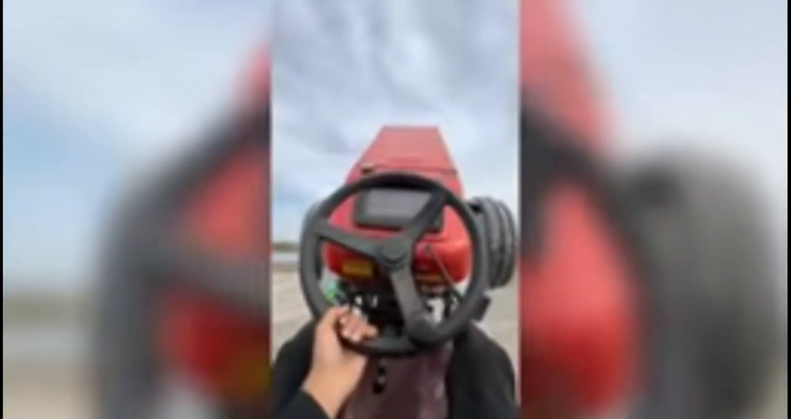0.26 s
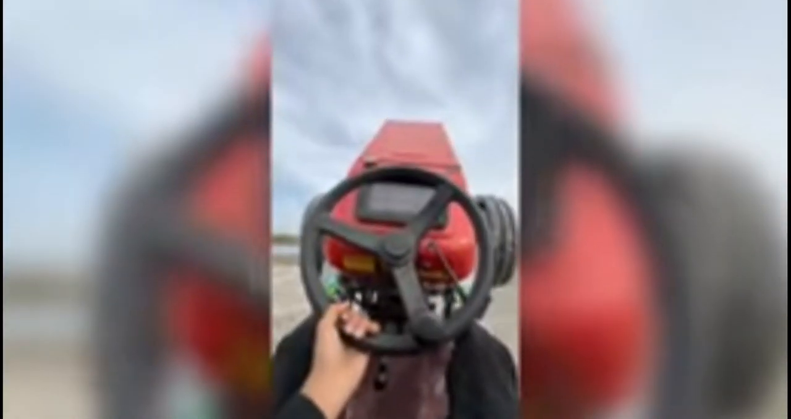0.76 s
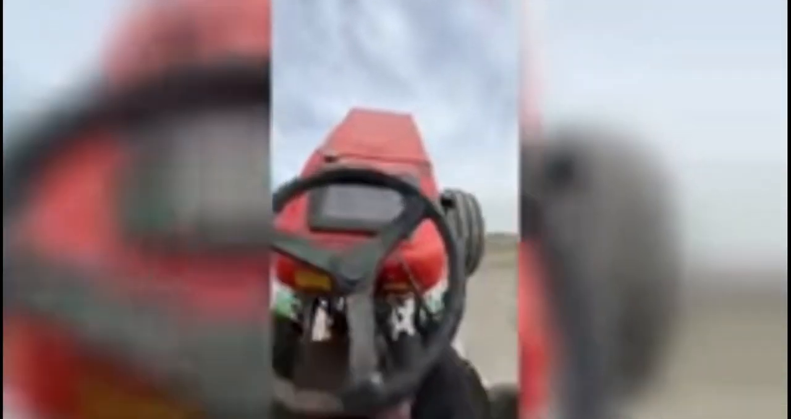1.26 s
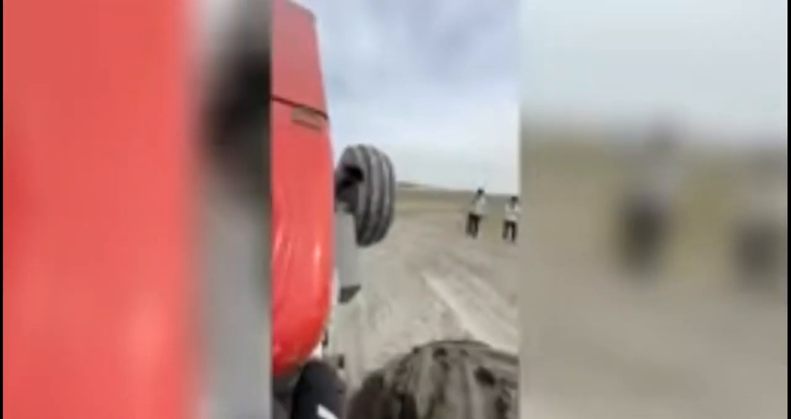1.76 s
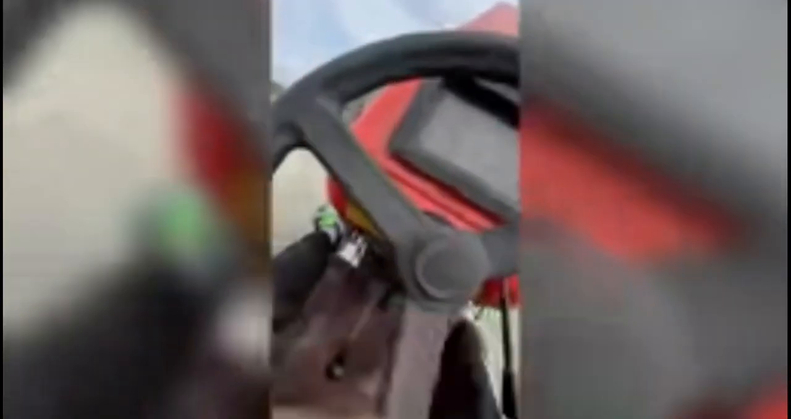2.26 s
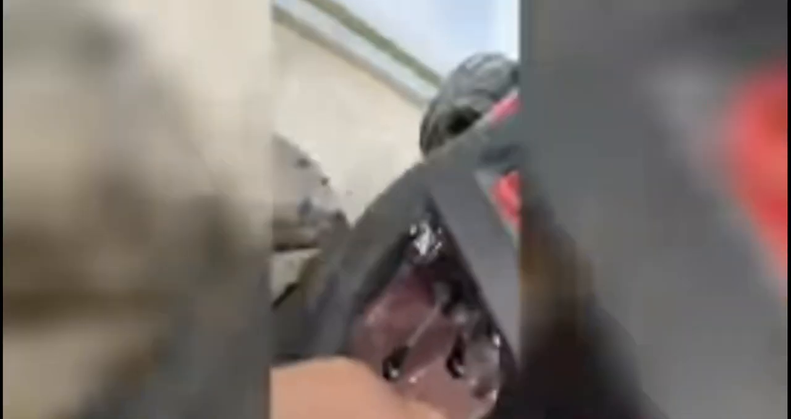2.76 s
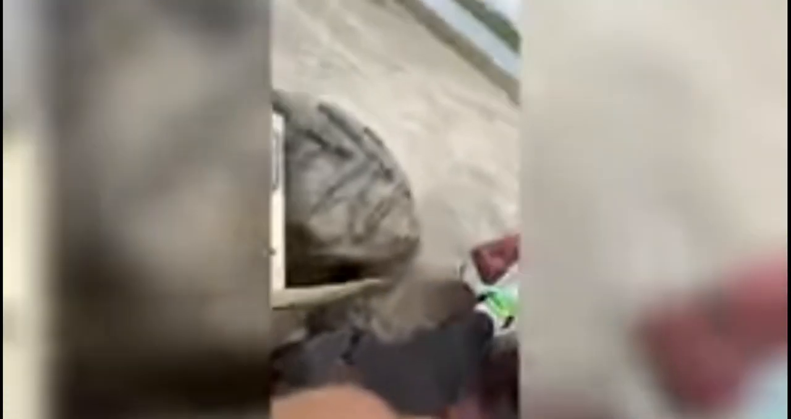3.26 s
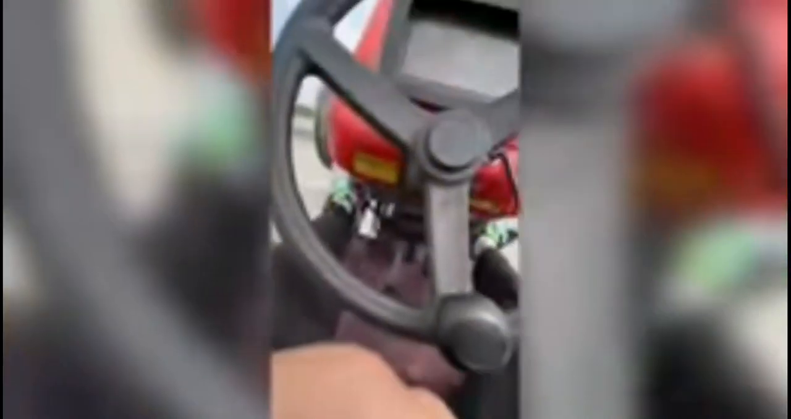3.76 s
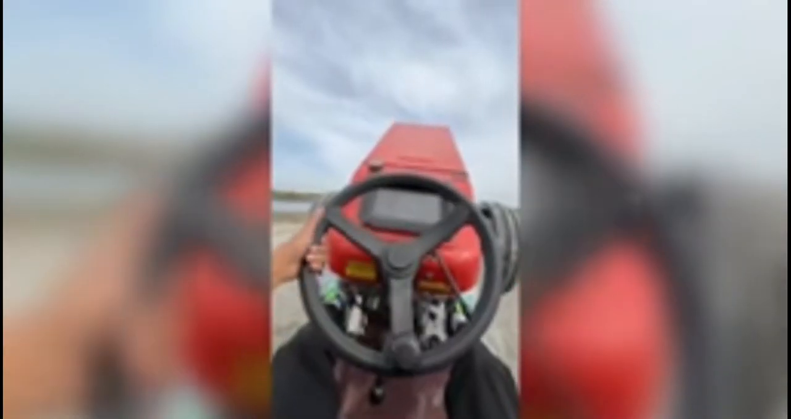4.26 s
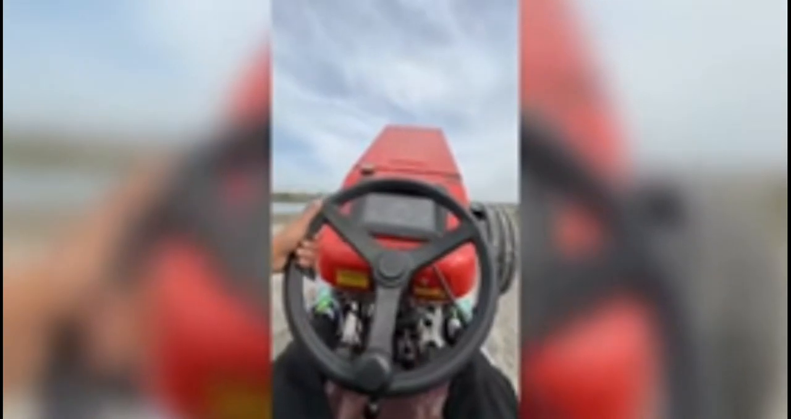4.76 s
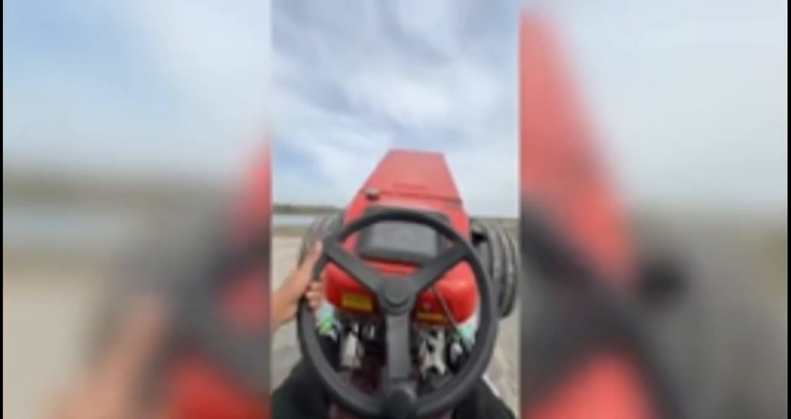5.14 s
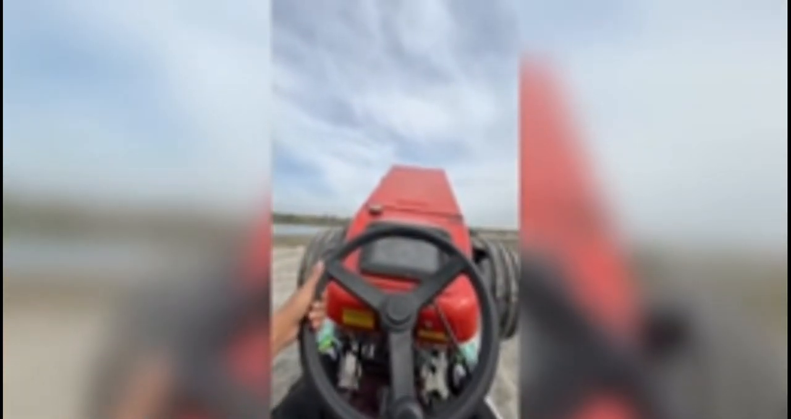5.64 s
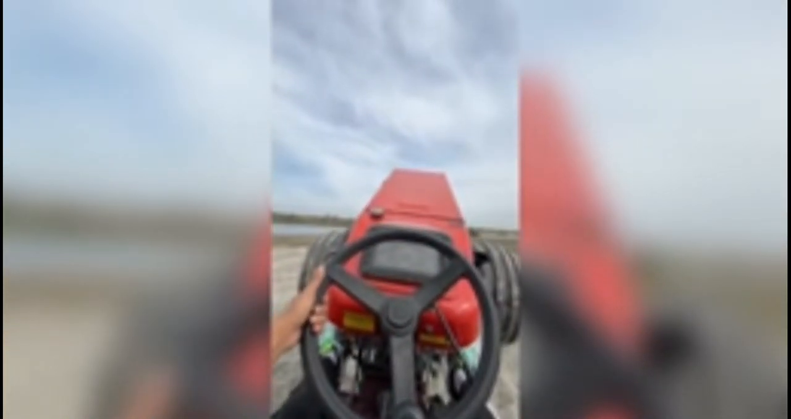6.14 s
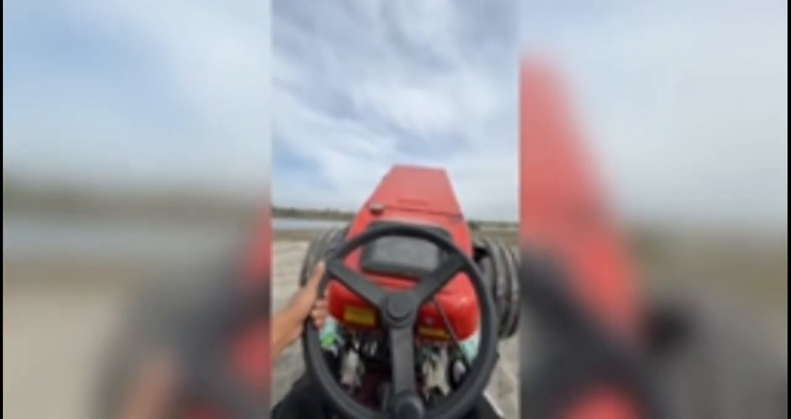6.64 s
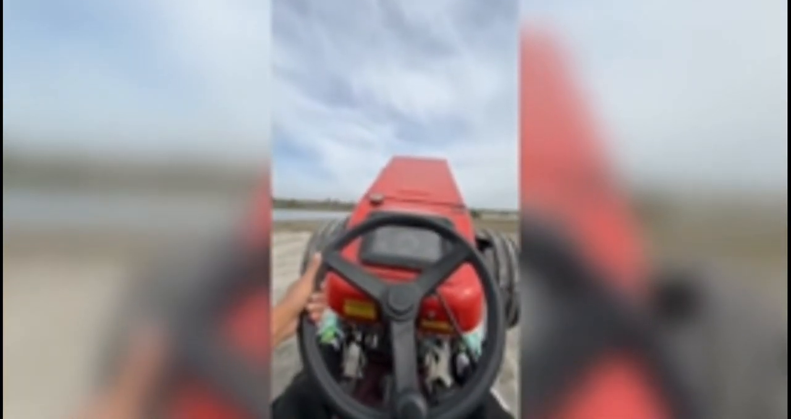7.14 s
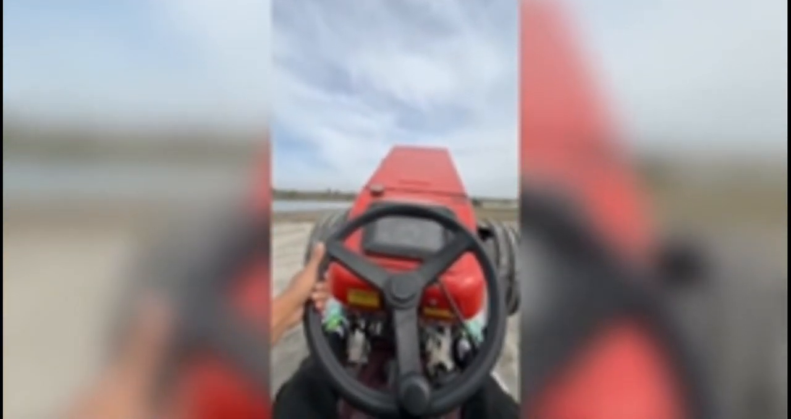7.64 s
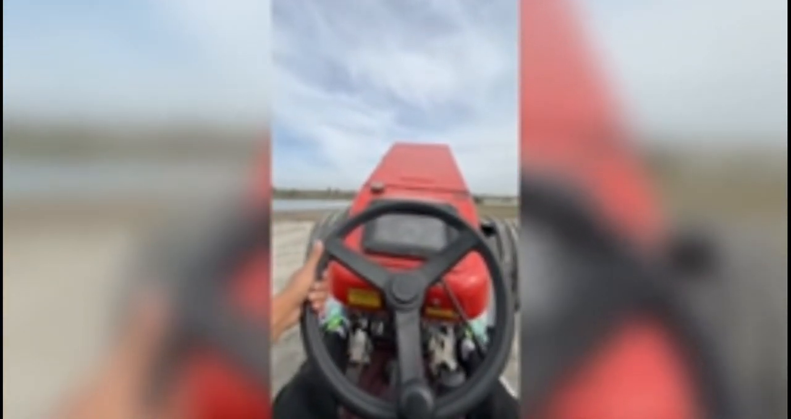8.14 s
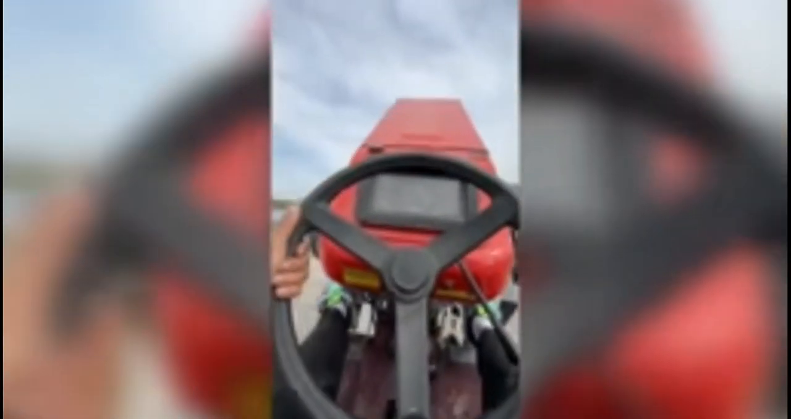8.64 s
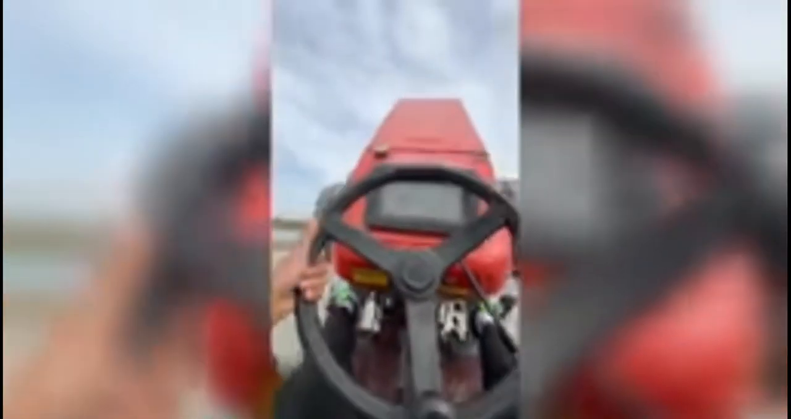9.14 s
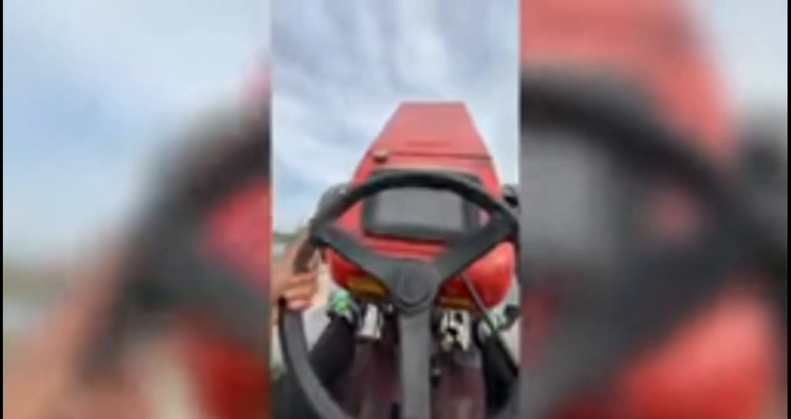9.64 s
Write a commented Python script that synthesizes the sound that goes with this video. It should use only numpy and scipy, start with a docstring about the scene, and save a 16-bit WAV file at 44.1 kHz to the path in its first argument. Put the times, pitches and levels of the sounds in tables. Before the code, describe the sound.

A three-cylinder tractor diesel runs outdoors, close to a small, thin-bassed microphone. From 0 s it clatters at about 36 firings a second, each a hard metallic knock with a short ring, a pulsing whistle near 7 kHz and a weak exhaust puff. Knocks are strongest around 1.1 s. A short rustle comes at 1.5-1.6 s as the microphone turns aside; until about 3 s the engine is quieter, duller and more of a rough roar, with a wavering gear tone near 530 Hz. At 3.34 s everything snaps off for a tenth of a second, then returns crisp and strongly knocking, steady to 8 s, the whistle higher and fainter. Around 8.4-8.9 s and again 9.4-9.7 s the knock dies to a softer mechanical rush, the firing rate wobbling slightly, knock returning after each. From 9.7 s a faint low hum winds up, with thin hiss swelling.

```python
"""Three-cylinder diesel tractor

A three-cylinder diesel tractor runs outdoors, heard by a small microphone that turns about.
Each firing excites the modes of the block, puffs down the exhaust and blows a high whistle; noise from
gears and fan roars in the same block, a gear sings for a while and a thin hiss lies on top.
The sound drops out once; twice the governor cuts the fuel and the knock dies; a hum winds up at the end."""
import sys
import numpy as np
from scipy import signal
from scipy.fft import rfft, irfft
from scipy.io import wavfile
from scipy.ndimage import uniform_filter1d, minimum_filter1d

SR = 44100
rng = np.random.default_rng(int(sys.argv[2]) if len(sys.argv) > 2 else 0)


def output_pcm(signal):
    """Save a mono or channel-first signal as 16-bit PCM at the path in sys.argv[1].

    Samples are clipped to [-1, 1] before scaling.
    """
    pcm = np.clip(np.atleast_2d(signal).T, -1, 1) * 32767
    wavfile.write(sys.argv[1], SR, np.round(pcm).astype(np.int16))


N = 436590
T = np.arange(N) / SR  # time in s

# Firing rate, one list before and one after the drop-out. Each row: time in seconds, firings per second.
FIRING_RATE = ([(0.0, 36.054), (0.8, 36.298), (1.62, 36.178), (3.34, 36.171)], [(3.43, 36.234),
                (4.93, 36.099), (5.73, 36.212), (7.77, 36.06), (8.08, 34.874), (8.23, 35.16),
                (8.54, 37.701), (8.71, 37.318), (9.09, 34.062), (9.26, 34.652), (9.46, 37.435),
                (9.59, 37.788), (9.9, 34.322)])
# Firings already done in the engine cycle when each of the two stretches starts.
FIRINGS_DONE = (2.6, 2.1)
# Relative strength of each cylinder in dB.
CYLINDER_DB = [-3, -5, -3.5]
# The clearest firings. Each row: time in seconds, nominal peak in dB, strongest ring in Hz.
HARD_KNOCKS = [(0.0682, -6.5, 2340), (0.095, -7, 2385), (0.1226, -12, 2480), (0.2334, -9, 2680),
               (0.3436, -6.5, 2390), (0.3985, -9.5, 2135), (0.4259, -4, 2690), (0.509, -5, 2340),
               (0.6748, -9.5, 2400), (0.869, -9, 2300), (0.8953, -8, 2380), (0.9778, -5.5, 2290),
               (1.0061, -6.5, 2300), (1.0337, -5, 2170), (1.0879, -1, 1550), (1.143, -2, 1490),
               (1.1717, -2, 2310), (1.3359, -2.5, 2020), (1.3643, -4.5, 3750), (1.4187, -6, 3600),
               (1.4745, -8, 3700), (1.503, -5.5, 2280), (1.6681, -8, 2680), (1.391, -9, 1980),
               (1.447, -9, 3870), (1.779, -10, 3620), (2.083, -12.5, 1480), (2.255, -11.5, 3300),
               (2.331, -12.5, 1530), (2.414, -11, 1450), (2.9982, -3, 2375), (3.0785, -7.5, 1600),
               (3.1618, -6, 1504), (3.2442, -6, 3320), (3.328, -6, 1560), (3.4542, -10, 2305),
               (3.6483, -7, 2345), (3.8154, -3.5, 3330), (3.8977, -8, 3300), (4.0344, -3, 3300),
               (4.1172, -3, 3380), (4.1451, -6, 2430), (4.1736, -6, 2360), (4.5323, -6, 3350),
               (4.6435, -9, 2360), (4.6984, -4.5, 2900), (4.8371, -7, 2800), (5.1134, -5.5, 1630),
               (5.2521, -8, 1514), (5.3634, -9, 3450), (5.4177, -5.5, 2470), (5.6113, -7, 2860),
               (5.6946, -7, 2800), (5.9156, -7, 1620), (6.1097, -7, 1490), (6.3576, -4.5, 2840),
               (6.607, -4, 2940), (6.7722, -6.5, 2380), (6.8555, -4.5, 2810), (7.0226, -7.5, 1565),
               (7.077, -6, 3880), (7.3274, -7.5, 3090), (7.7704, -6.5, 3000), (7.8542, -7, 1650),
               (8.0807, -11, 2380), (8.167, -6, 2980), (8.2234, -7.5, 2580), (8.9052, -10.5, 2870),
               (8.9616, -8.5, 3090), (8.99, -9, 2480), (9.0189, -9, 2610), (9.0768, -6.5, 2550),
               (9.1357, -11.5, 2530), (9.2539, -9.5, 2050), (9.282, -9.5, 1726), (9.3098, -7.5, 4070)]
# Modes of the block. Each row: frequency in Hz, width in Hz before the knock broadens it, relative level in dB.
BLOCK_MODES = [(811, 42, 8), (930, 79, 4.5), (1000, 42, 2.5), (1537, 89, 5), (1952, 44, 10.5),
               (2117, 80, 8.5), (2395, 295, 9.5), (2818, 150, 12.5), (3144, 78, 6.5), (3372, 58, 12),
               (3822, 124, 15.5), (4123, 99, 13.5), (4560, 200, 8.5), (5813, 100, 11.5)]
# Spectral shape of the block's sound. Each row: frequency in Hz, relative level in dB per Hz.
BLOCK_SPECTRUM = [(150, -29.5), (250, -23.5), (430, -21), (620, -8.5), (850, 2.5), (1150, -4.5),
                  (1550, -1.5), (2400, 0.5), (4000, -15.5), (4600, -23), (5150, -19.5), (5800, -5),
                  (6400, 0.5), (7500, -12), (7900, -35), (9200, -21), (16000, -78)]
# Bands of the block's sound, the reference band first. Each row: lower edge in Hz, upper edge in Hz.
BANDS_HZ = ([1800, 3000], [250, 680], [680, 1100], [1100, 1800], [3000, 4100], [4100, 4800], [4800, 5500],
             [5500, 9000])
# How the microphone hears the engine with fuel on. Each row: time in seconds, level in dB at 1.8-3 kHz,
# pose, knock over roar in dB. Poses: 0 facing the bonnet, 1 turned aside, 2 close to the wheel,
# 3 held back, 4 over the wheel; values between blend and values outside stay at the nearest pose.
HEARD = [(0, -24.5, -0.5, 7), (0.4, -27, 0, 0.5), (0.7, -29.5, 0.77, 3.5), (1, -23.5, 0, 4),
         (1.3, -25, -0.2, 1), (1.6, -31, 1, 6), (2.1, -30.5, 1.07, 7), (2.35, -32, 1, 3),
         (2.6, -35.5, 1, -4), (3.05, -28.5, 1, -2.5), (3.33, -25, 0.5, 2), (3.46, -25, 2.5, 9),
         (4.2, -25, 3, 9.5), (4.6, -24.5, 3.0, 10.5), (7, -24.5, 3, 12.5), (8, -26.5, 3.5, 13),
         (8.4, -29, 3.5, 10.5), (9.1, -25.5, 3, 13), (9.4, -29, 5.5, 13.5), (9.9, -28.5, 3, 9.5)]
# Colour of each pose. Each row is a pose: level in dB relative to the reference band
# at 0.25-0.68, 0.68-1.1, 1.1-1.8, 3-4.1, 4.1-4.8, 4.8-5.5 and 5.5-9 kHz.
POSE_BANDS_DB = [(-19.5, -13, -6, -6.5, -13.5, -20.5, -15), (-8, -4, 0.5, 0, -16, -20.5, -19),
                 (-26, -3.5, -1.5, 2.5, -18.5, 3.5, -15), (-16.5, -5, -4, -1, -10, -26.5, -16.5),
                 (-9.5, -3, -2.5, -5.5, -8, -16, -12.5)]
# One entry per pose: usual upper ring in Hz, spread of the later blows in seconds.
POSE_RING_HZ = [2300, 3475, 3350, 2840, 2644]
POSE_BLUR_S = [.005, .012, .006, .006, .006]
# One entry per pose: whistle offset in dB, its fall within a firing in dB, share of its sag in pitch.
POSE_WHISTLE_DB = [-2, -7.5, 5, -2, 1]
POSE_FALL_DB = [1, -1.5, 6, -12, -11]
POSE_BEND = [0.97, 0.53, 0.81, 0.94, 1]
# One entry per pose: exhaust rumble with fuel on in dB.
POSE_RUMBLE_DB = [-46.5, -48, -46, -46, -48.5]
# The top of the treble dims. Each row: start in seconds, end in seconds, change in dB.
DULL = [(1.713, 2.21, -8), (2.526, 2.94, -7)]
# Governor lift-offs. Each row: fuel cut in seconds, fuel back in seconds, length of the return in seconds.
LIFT_OFFS = [(8.414, 8.875, 0.056), (9.387, 9.714, 0.13)]
# Change of each band without fuel in dB, in the order of the pose columns.
LIFT_BANDS_DB = (-3, -3.5, -2, -6, -7.5, -1.5, -4)
# Whistle pitch before the sag and waver. Each row: time in seconds, pitch in Hz.
WHISTLE_PITCH = [(0, 6870), (0.5, 6800), (1.5, 6930), (2.55, 6920), (3.1, 7040), (3.33, 6980), (3.46, 7380),
                 (5.5, 7560), (7.8, 7780), (8, 7960), (8.32, 8600), (8.43, 8580), (8.62, 7600),
                 (8.78, 7020), (8.9, 6860), (9.07, 7200), (9.3, 8120), (9.45, 8300), (9.6, 7450),
                 (9.8, 7000), (9.9, 7020)]
# A higher whistle is mostly fainter. Each row: pitch in Hz, level in dB before the other offsets.
WHISTLE_BY_PITCH = [(6950, -27), (7150, -28), (7400, -35), (7800, -43), (8300, -50), (8760, -42)]
# The whistle fades for a moment. Each row: centre in seconds, half length in seconds, change in dB.
WHISTLE_DIPS = [(2.407, 0.25, -10), (2.74, 0.26, -20), (8.347, 0.054, -11), (9.45, 0.14, -19)]
# The sag in pitch shrinks: from this pitch in Hz, to this pitch in Hz, down to this share.
BEND_FADES_HZ = (7370, 8450, 0.34)
# Exhaust puffs with fuel on. Each row: time in seconds, level in dB.
PUFFS = [(0, -45.5), (2.6, -46.5), (3.2, -38.5), (3.46, -46.5), (4, -42.5), (6.1, -47), (8.4, -44),
         (9.9, -46)]
# Spectral shape of the pipe. Each row: frequency in Hz, relative gain in dB.
PIPE = [(30, -55.5), (108, -20), (145, -8), (180, -0.5), (217, -2.5), (253, 2.5), (290, -4.5), (325, -3),
        (380, -27.5), (450, -31), (900, -56.5), (3000, -94)]
# Spectral shape of the low rumble. Each row: frequency in Hz, relative level in dB per Hz.
RUMBLE = [(30, -68.5), (100, -37), (170, -20.5), (220, -5), (300, -4.5), (420, -8.5), (550, -15),
          (900, -94)]
# Thin hiss before its flicker, swelling at the end. Each row: time in seconds, level in dB.
AIR = ([(0, -70), (1.1, -68.5), (1.55, -57), (1.7, -79), (3.46, -67), (3.8, -71), (9.64, -77), (9.72, -55),
        (9.9, -51)],)
# Spectral shape of the hiss. Each row: frequency in Hz, relative level in dB per Hz.
AIR_COLOUR = [(6000, -49), (8600, -22), (9500, 1), (12500, -5.5), (14000, -14.5), (15000, -6), (16000, -6)]
# Rustles near the microphone. Each row: time in seconds, peak level in dB, decay by 60 dB in seconds.
RUSTLES = [(1.477, -46, 0.03), (1.597, -29.5, 0.05), (1.612, -46, 0.078), (2.682, -41.5, 0.048)]
# A gear sings. Each row: time in seconds, level in dB.
GEAR = [(0.8, -66), (1.0, -52), (1.5, -52), (1.75, -43), (2.75, -47), (2.9, -50), (3.05, -41.5),
        (3.34, -46), (3.44, -69)]
# Spectral shape of a faint steady wash. Each row: frequency in Hz, relative level in dB per Hz.
WASH = [(59, -39.5), (100, -10), (325, -30), (731, 0.5), (929, -23), (2290, -8.5), (4440, -16),
        (8160, -35.5), (10600, -49.5), (18000, -120)]

KNOCK_CREST_DB = 20  # nominal peak of an ordinary knock over the engine level
LOW_RING_HZ, LOW_RING_SHARE, RING_SPREAD = 1550, 0.27, 0.132  # share of firings; spread in log frequency
ACCENT_DB, ACCENT_SPREAD = 5, 0.085  # modes within about that share of the strongest ring stand out
CLANK_DB, CLANK_T60_S, CLANK_RISE_S = -8.5, 0.036, 0.0018  # strongest ring, against the rattle
FLICKER_S, FLICKER_DB, FLICKER_DULL = .035, 2, 0.34  # last: further flicker in dB per dB of dimming
DULL_EDGE_S, DULL_WHISTLE_SHARE = 0.053, 0.63
CUT_S = 0.11  # time the fuel cut takes
LIFT_DB, LIFT_KNOCK_DB, LIFT_EXHAUST_DB = -5.5, -21.5, -5.5  # changes without fuel
LIFT_WHISTLE_DB, LIFT_FALL_DB = -15, 23
WHISTLE_LATE = 0.023  # share of a firing interval by which the whistle follows the knock
GEAR_HZ = 529
HUM_START_S, HUM_FROM_HZ, HUM_TOP_HZ, HUM_WIND_S = 9.7, 45, 165.5, 0.097
HUM_DB, HUM_QUIET_DB, HUM_GROW_S = -47, -33, .035  # final level, how far below it starts, growth time
DROP_S, DROP_SNAP_DB, DROP_DB, DROP_FADE_S = 3.338, -24, -58, .006
RETURN_S, RETURN_FADE_S = 3.430, .008
EDGE_HZ = 15800  # upper edge of all sound


def amp(db):
    """Amplitude is ten to the power of the level over 20."""
    return 10 ** (np.asarray(db) / 20)


def evened(x):
    """Normalisation: division by the effective value gives unit mean power."""
    return x / np.sqrt(np.mean(x ** 2) + 1e-20)


def curves(tables):
    """Linear interpolation of every column of the joined tables, sample by sample."""
    s, *columns = np.concatenate(tables).T
    return [np.interp(T, s, c) for c in columns]


def colour(x, points):
    """Minimum phase: a causal filter follows from the log spectrum given by (Hz, dB) points."""
    f, db = np.transpose(points)
    hz = abs(np.fft.fftfreq(8192, 1 / SR))
    log_gain = np.interp(np.log(hz + 1), np.log(f + 1), db) * np.log(10) / 20
    taps = np.fft.ifft(np.exp(np.conj(signal.hilbert(log_gain)))).real[:4096]
    return signal.oaconvolve(x, taps)[:N]


def ring(x, hz, width):
    """Resonance: a two-pole mode of unit peak gain, its width in Hz setting its damping."""
    return signal.lfilter(*signal.iirpeak(hz, hz / width, SR), x)


def decay(x, t60):
    """Exponential decay: every click grows a tail that falls 60 dB in t60 seconds."""
    return signal.lfilter([1], [1, -np.exp(-np.log(1000) / (t60 * SR))], x)


def span(start, end, rise, fall):
    """Linear gating: 0 outside, 1 inside, with straight ramps from start and from end."""
    return np.clip((T - start) / rise, 0, 1) - np.clip((T - end) / fall, 0, 1)


def by_pose(values):
    """Directivity: a value per pose, blended as the microphone turns."""
    return np.interp(curves([HEARD])[1], np.arange(len(values)), values)


def lifted():
    """Governor action: 1 while the fuel is cut, 0 while it flows."""
    return sum(span(cut, back, CUT_S, takes) for cut, back, takes in LIFT_OFFS)


def dull_db():
    """Spectral dimming: the change in dB at the top of the treble."""
    return sum(db * span(a, b, DULL_EDGE_S, DULL_EDGE_S) for a, b, db in DULL)


def firings():
    """Phase is the integral of rate: a running count whose whole numbers are the firings."""
    count = np.zeros(N)
    for rows, done in zip(FIRING_RATE, FIRINGS_DONE):
        s, rate = np.transpose(rows)
        on = T >= s[0]
        count[on] = done + np.cumsum(np.interp(T[on], s, rate)) / SR
    # whole cycles of three added, so that the count never steps back
    return count + 1000 * 3 * (T >= FIRING_RATE[1][0][0])


def combustion(count, level_db):
    """Cyclic variation: each firing has its own instant (sample), strength (dB) and strongest ring (Hz)."""
    at = np.flatnonzero(np.diff(np.floor(count)) > 0)
    cylinder = count[at + 1].astype(int) % 3
    size_db = np.take(CYLINDER_DB, cylinder) + 1.1 * rng.standard_normal(len(at))
    # entry 0 of the rings stands for the time before the first firing
    low = rng.random(len(at) + 1) < LOW_RING_SHARE
    chance = rng.standard_normal(len(at) + 1)
    upper_hz = by_pose(POSE_RING_HZ)[np.append(0, at)] * np.exp(RING_SPREAD * chance)
    accent_hz = np.where(low, LOW_RING_HZ * np.exp(.03 * chance), upper_hz)
    for s, db, hz in HARD_KNOCKS:
        k = np.argmin(abs(at - s * SR))
        at[k] = round(s * SR)
        size_db[k] = db - level_db[at[k]] - KNOCK_CREST_DB
        accent_hz[k + 1] = hz
    return at, size_db, accent_hz


def clank(at, size_db, accent_hz, firing):
    """Free vibration: the strongest ring of each firing rises fast and dies exponentially."""
    since = (np.arange(N) - np.append(0, at)[firing]) / SR
    envelope = amp(np.append(-99, size_db)[firing] - 60 * since / CLANK_T60_S)
    envelope *= 1 - np.exp(-since / CLANK_RISE_S)
    hz = accent_hz[firing]
    return envelope * np.minimum(1, hz / 2000) ** 2 * np.sin(2 * np.pi * hz * since)


def knock(count, level_db):
    """Impact excitation: combustion hits the block, then twice more within ms, and rings its modes."""
    at, size_db, accent_hz = combustion(count, level_db)
    later = np.arange(3) > 0
    scatter = rng.random((len(at), 3))
    delay = (0.002057 + by_pose(POSE_BLUR_S)[at, None] * scatter) * later
    blow_db = size_db[:, None] - later * (4.5 + 6 * rng.random(delay.shape))
    hits, first = np.zeros(N + SR), np.zeros(N)
    np.add.at(hits, at[:, None] + (delay * SR).astype(int), amp(blow_db))
    hits = hits[:N]
    first[at] = amp(size_db)

    rattle_power = decay(hits ** 2, 0.022) + amp(-20.0) * decay(hits ** 2, 0.055)  # powers add
    burst = decay(np.sqrt(rattle_power), 0.0052)  # pressure needs most of a ms to build
    burst /= burst[np.minimum(at + 40, N - 1)].mean() / amp(size_db).mean()

    firing = np.searchsorted(at, np.arange(N))
    out = amp(-4.5) * burst * rng.standard_normal(N)
    for hz, width, db in BLOCK_MODES:
        loose = min(1, hz / 2000) ** 1.5  # the low body modes vary less from firing to firing
        chance = np.clip(rng.standard_normal(len(at) + 1), -2, 1.2) * max(loose, .7)
        accent_db = ACCENT_DB * np.exp(-(np.log(hz / accent_hz) / ACCENT_SPREAD) ** 2)
        share = amp(db + 3. * chance + accent_db)[firing]
        struck = 16.2 * loose * hits + 30 * (1 - loose) * first
        # the blow reaches each panel by its own path
        struck = np.roll(struck, rng.integers(5, 70)) * rng.choice([-1, 1])
        rattle = loose * burst * rng.standard_normal(N)
        out += ring(share * (rattle + struck), hz, 1.17 * width)
    return evened(evened(out) + amp(CLANK_DB) * evened(clank(at, size_db, accent_hz, firing)))


def roar():
    """Random excitation: gears, fan and valves drive the block with ticking noise; its modes wander."""
    tick_db = 3. * np.minimum(rng.exponential(1, N), 3) - 12 * lifted()
    ticks = (rng.random(N) < 300 / SR) * amp(tick_db)  # about 300 a second
    rattle = (1 + 0.63 * decay(ticks, 0.019)) * rng.standard_normal(N)
    out, calm = rattle.copy(), 1 - 0.67 * lifted()
    steps = np.arange(0, N / SR + 1, .04)
    for hz, width, db in BLOCK_MODES:
        wander = np.interp(T, steps, rng.standard_normal(len(steps)))
        mode_db = db - 17 + 8 * calm * np.minimum(wander, 1.5)
        out += amp(mode_db) * ring(rattle, hz, width)
    duller = signal.butter(2, 6800, fs=SR, output="sos")
    return evened(signal.sosfilt(duller, out))


def block(count):
    """Shared radiator: knock and roar leave by one block, its bands weighted by the microphone's pose."""
    level_db, _, knock_db = curves([HEARD])
    lift = lifted()
    dull = dull_db()
    level_db = level_db + LIFT_DB * lift
    tilt_db = [by_pose(db) + lift_db * lift for db, lift_db in zip(np.transpose(POSE_BANDS_DB), LIFT_BANDS_DB)]
    tilt_db[-3:] = [db + dull for db in tilt_db[-3:]]
    # the treble flickers in patches, more where it dims or the fuel is cut
    steps = np.arange(0, N / SR + 1, FLICKER_S)
    flicker_db = FLICKER_DB + FLICKER_DULL * abs(dull) + FLICKER_DB * lift
    for k, patches in zip(range(-4, 0), rng.standard_normal((4, len(steps)))):
        tilt_db[k] = tilt_db[k] + flicker_db * np.interp(T, steps, patches)

    share = amp(knock_db + LIFT_KNOCK_DB * lift)
    mix = (share * knock(count, level_db) + roar()) / np.sqrt(1 + share ** 2)
    spectrum = rfft(colour(mix, BLOCK_SPECTRUM))
    hz, out = np.fft.rfftfreq(N, 1 / SR), np.zeros(N)
    for (lo, hi), db in zip(BANDS_HZ, [0] + tilt_db):
        band = np.clip((hz - lo) / 200 + .5, 0, 1) - np.clip((hz - hi) / 200 + .5, 0, 1)
        out += amp(level_db + db) * evened(irfft(spectrum * band, N))
    return out


def whistle(count):
    """Jet tone: gas through a narrow gap blasts after each firing, sags, and nearly stops by the next."""
    hz = curves([WHISTLE_PITCH])[0]
    level_db = np.interp(hz, *np.transpose(WHISTLE_BY_PITCH)) + by_pose(POSE_WHISTLE_DB)
    level_db += LIFT_WHISTLE_DB * lifted() + DULL_WHISTLE_SHARE * dull_db()
    level_db += sum(db * np.clip(1 - abs(T - s) / half, 0, 1) for s, half, db in WHISTLE_DIPS)

    count = np.maximum(count - WHISTLE_LATE, 0)
    part = count % 1  # place within the firing interval
    flow_db = np.interp(part, [0, .06, .14, .3, .78, .92, 1], [-22.0, -0.5, 1.5, -4.5, -2.5, -17.5, -27.0])
    fall_db = by_pose(POSE_FALL_DB) + LIFT_FALL_DB * lifted()
    flow_db += fall_db * np.clip((part - .15) / 0.44, 0, 1)

    bend = np.interp(part, [0, .1, .25, .6, 1], [.945, .96, 1.003, 1.002, .965])
    bend_share = by_pose(POSE_BEND) * np.interp(hz, BEND_FADES_HZ[:2], [1, BEND_FADES_HZ[2]])
    bend = 1 + bend_share * (bend - 1)
    waver = evened(uniform_filter1d(rng.standard_normal(N), 120))
    tone = np.sin(2 * np.pi * np.cumsum(hz * bend * (1 + 0.0026 * waver)) / SR)

    flutter_db = 2.4 * evened(uniform_filter1d(rng.standard_normal(N), 90))
    firing_db = 2. * rng.standard_normal(int(count.max()) + 1)[count.astype(int)]
    gain = uniform_filter1d(amp(flow_db + flutter_db + firing_db), 44)  # the flow cannot jump
    mean_power = uniform_filter1d(gain ** 2, SR // 3)
    return amp(level_db) * tone * gain * np.sqrt(2 / mean_power)


def exhaust(count):
    """Pulsed flow: one puff a firing is coloured by the pipe, over a rumble of low noise."""
    puffs_db = curves([PUFFS])[0] + LIFT_EXHAUST_DB * lifted()
    rumble_db = by_pose(POSE_RUMBLE_DB) + LIFT_EXHAUST_DB * lifted()
    late = count - .2  # a fifth of an interval after the knock
    puffs = np.append(0, np.diff(np.floor(late)) > 0) * amp(0.86 * rng.standard_normal(N))
    rumble = evened(colour(rng.standard_normal(N), RUMBLE))
    return amp(puffs_db) * evened(colour(puffs, PIPE)) + amp(rumble_db) * rumble


def air(count):
    """Modulated noise: a thin hiss flickers with the firings until the hum starts; a few rustles join."""
    flicker_db = 3.0 * evened(uniform_filter1d(rng.standard_normal(N), 900))
    flicker_db += 2. * np.cos(2 * np.pi * (count - .15))
    level = amp(curves(AIR)[0] + flicker_db * (T < HUM_START_S))
    for s, db, t60 in RUSTLES:
        level = level + amp(db - 60 * np.maximum(T - s, 0) / t60 - 4800 * np.maximum(s - T, 0))
    return level * evened(colour(rng.standard_normal(N), AIR_COLOUR))


def gear():
    """Narrow-band noise: slow random amplitude and phase make a singing gear waver about one pitch."""
    db = curves([GEAR])[0]
    noise = rng.standard_normal((2, N))
    waver = evened(signal.lfilter([1], [1, -np.exp(-np.pi * 9. / SR)], noise))  # 9 Hz wide
    tone = (waver[0] + 1j * waver[1]) * np.exp(2j * np.pi * GEAR_HZ * T)
    return np.sqrt(2) * amp(db) * tone.real


def hum():
    """Exponential approach: a low hum winds up towards its top pitch as it swells."""
    t = np.maximum(T - HUM_START_S, 0)
    hz = HUM_TOP_HZ - (HUM_TOP_HZ - HUM_FROM_HZ) * np.exp(-t / HUM_WIND_S)
    db = HUM_DB + HUM_QUIET_DB * np.exp(-(t / HUM_GROW_S) ** 2 / 2)
    return np.sqrt(2) * amp(db) * np.sin(2 * np.pi * np.cumsum(hz) / SR) * (t > 0)


def scene():
    """Superposition: the pressures of all the sources add."""
    count = firings()
    return (block(count) + whistle(count) + exhaust(count) + gear() + air(count) + hum())[None]


def dropout_db():
    """Attenuation in time: the sound snaps off, fades out, and eases back."""
    off = DROP_DB + (DROP_SNAP_DB - DROP_DB) * np.exp(-np.maximum(T - DROP_S, 0) / DROP_FADE_S)
    snap = np.clip((T - DROP_S) * 1000, 0, 1)
    return off * snap * np.exp(-np.maximum(T - RETURN_S, 0) / RETURN_FADE_S)


def record(dry):
    """Limiting and filtering: hard knocks are held down, the sound drops out, and the bass cut rings on."""
    room = np.minimum(1, .6 / (abs(dry) + 1e-9))
    held = dry * uniform_filter1d(minimum_filter1d(room, 265), 265)
    bass_cut = signal.butter(3, 85, "high", fs=SR, output="sos")
    cut = signal.sosfilt(bass_cut, held * amp(dropout_db()))
    # a faint low flutter and a faint wash stay through the drop-out
    cut += amp(-81.5) * evened(ring(ring(rng.standard_normal(N), 48, 40), 48, 40))
    cut += amp(-63.0) * evened(colour(rng.standard_normal(N), WASH))
    treble_edge = signal.firwin(511, EDGE_HZ, window=("kaiser", 9), fs=SR)
    return signal.oaconvolve(cut, treble_edge[None], "same")


dry = scene()
out = record(dry)
output_pcm(out)
```